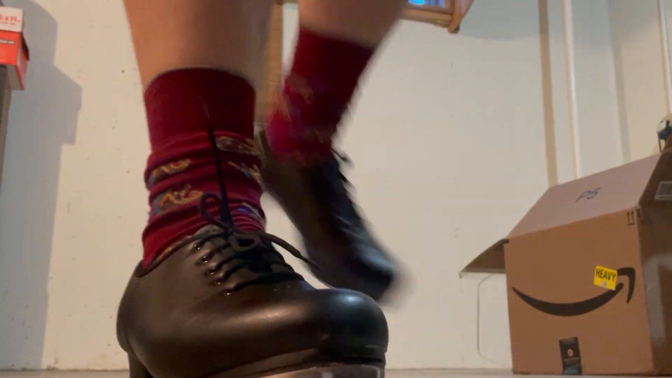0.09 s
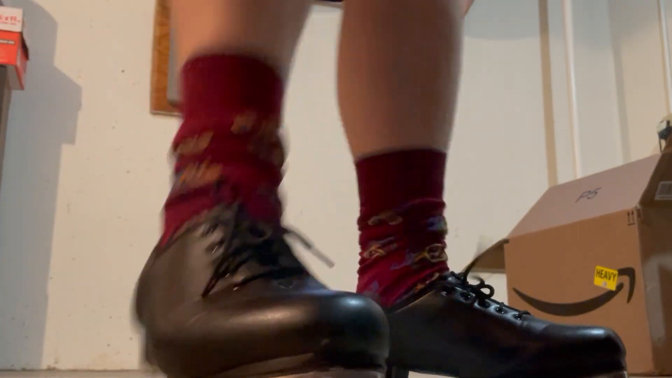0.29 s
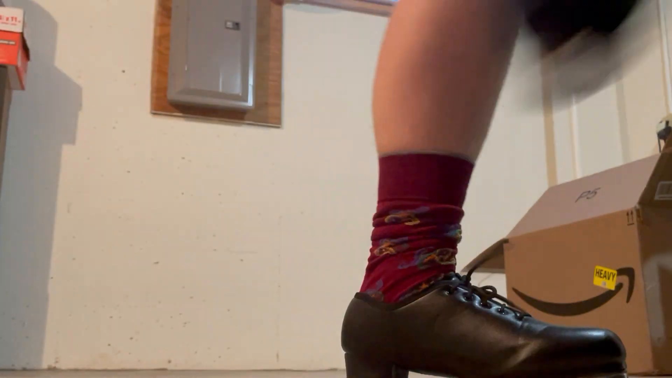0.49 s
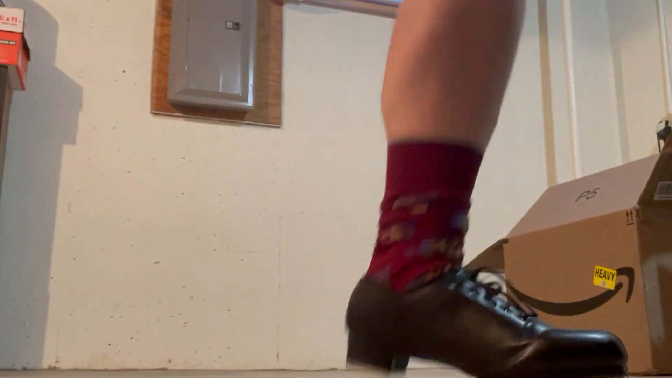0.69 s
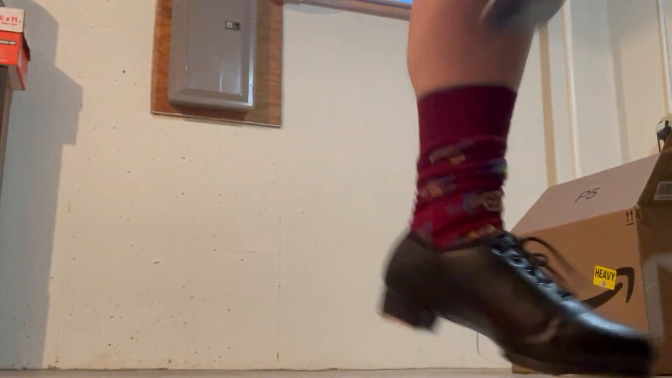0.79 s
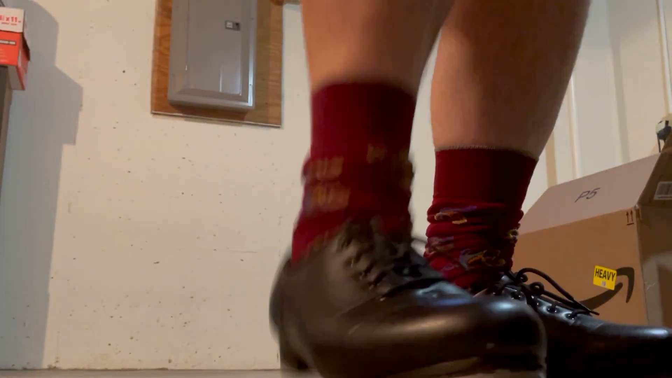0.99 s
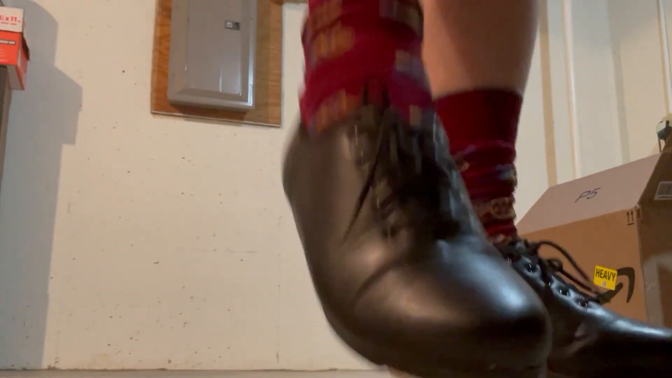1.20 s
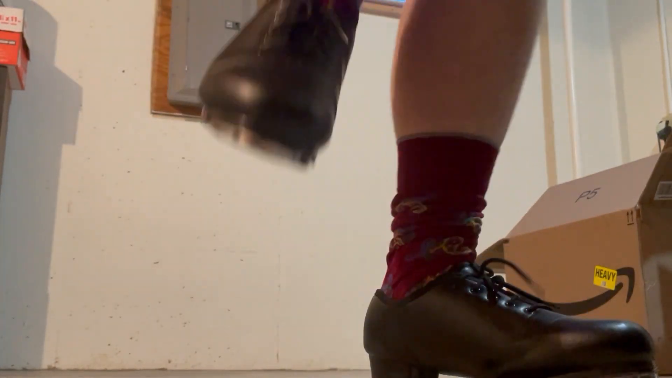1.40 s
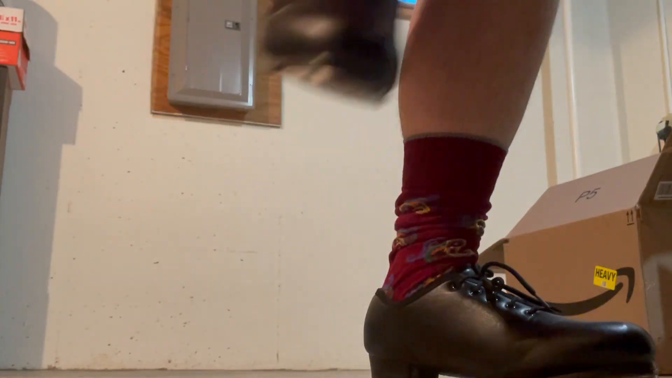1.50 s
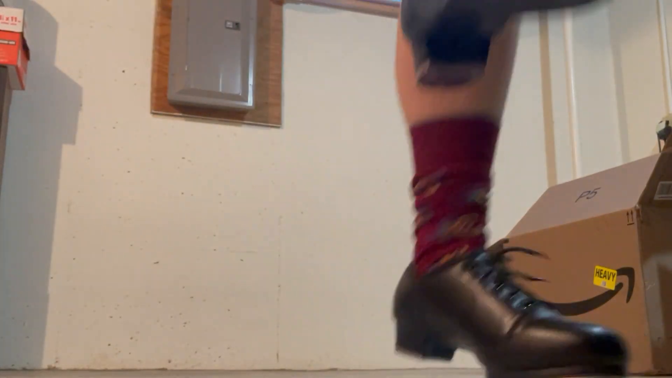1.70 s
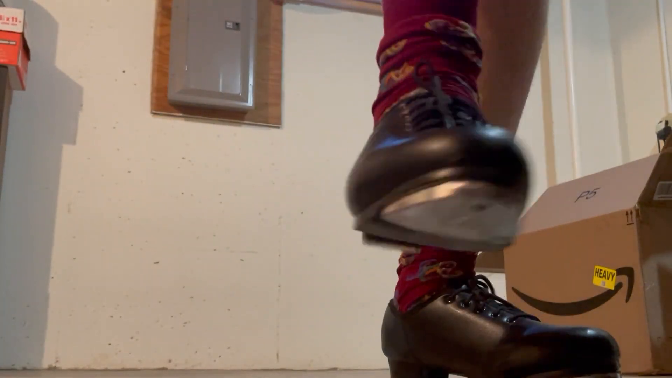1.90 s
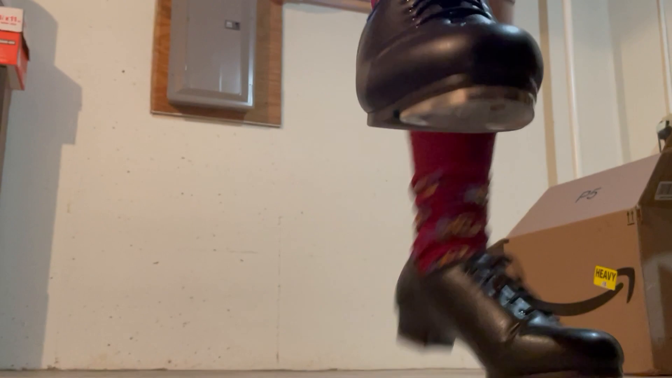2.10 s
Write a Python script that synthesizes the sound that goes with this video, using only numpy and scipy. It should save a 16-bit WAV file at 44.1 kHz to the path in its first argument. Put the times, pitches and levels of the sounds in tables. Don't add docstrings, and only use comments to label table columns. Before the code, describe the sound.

Tap shoes strike a hard floor very close to a phone microphone: a dense rattling burst, a pause, a quick double cluster with scrapes, then two separate hits, with short bare-room echo and faint air hush.

```python
import sys
import numpy as np
from scipy import signal
from scipy.fft import rfft, irfft, next_fast_len
from scipy.io import wavfile

SR = 44100
rng = np.random.default_rng(int(sys.argv[2]) if len(sys.argv) > 2 else 0)


def pcm_store(signal):
    levels = np.round(np.clip(np.atleast_2d(signal), -1, 1) * 32767)
    wavfile.write(sys.argv[1], SR, levels.astype(np.int16).T)


def field_ratio(decibels):
    return 10 ** (np.asarray(decibels, dtype=float) / 20)


N = 92610
SIZE = next_fast_len(N + SR)
HZ = np.arange(SIZE // 2 + 1) * SR / SIZE


def curve(table, hz=HZ):
    rows = np.array(table, float)
    return np.interp(np.log(hz + 1), np.log(rows[:, 0] + 1), rows[:, 1])


def shaped(x, gain):
    return irfft(rfft(x, SIZE) * gain, SIZE)[..., :N]


def add(track, s, sound):
    i = int(s * SR)
    a, b = max(i, 0), min(i + len(sound), N)
    track[a:b] += sound[a - i:b - i]


def ring(modes, length_s, chance, late_s=0.):
    t = np.arange(int(length_s * SR)) / SR
    scatter_db, detune = 8, 0.0092
    out = np.zeros(len(t))
    for (hz, db, t60), (louder, higher) in zip(modes, chance):
        tone = np.sin(2 * np.pi * hz * (1 + detune * higher) * (t - late_s))
        out += field_ratio(db + scatter_db * louder) * field_ratio(-60 * t / t60) * tone
    return out


def hush():
    # f/Hz, level/dB
    colour = [(30, -10.5), (60, 5.5), (200, -8.5), (800, -13), (2200, -14.5), (4500, -36), (9000, -26.5),
              (16000, -29)]
    # t/s, level/dB
    swell = [(0, -5), (.14, 3), (.19, -6), (.5, 0), (2.1, -3)]
    air = shaped(rng.standard_normal((2, N)), field_ratio(curve(colour)))
    level_db = -60 + np.interp(np.arange(N) / SR, *np.array(swell).T)
    return air / air.std() * field_ratio(level_db)


def scuffs():
    # start/s, loudest/s, end/s, level/dB, resonance f/Hz
    slides = [(-.02, 0.001, 0.1, -58, 2130), (0.109, 0.115, 0.13, -54.5, 1190),
              (0.073, 0.11, 0.15, -69, 10500), (.207, 0.232, 0.24, -35.5, 1140),
              (0.453, 0.723, 0.95, -62.5, 14400), (1.452, 1.64, 1.92, -64, 14500),
              (1.98, 2.073, 2.24, -66, 14700), (0.699, 0.726, 0.71, -54, 3770),
              (0.774, 0.794, 0.816, -48, 344), (0.777, 0.811, 0.89, -52, 2400),
              (0.798, 0.843, 0.85, -56, 2580), (1.202, 1.25, 1.43, -46.5, 9500),
              (0.958, 0.978, .98, -23, 3100), (0.988, 1.024, 1.07, -33.5, 3600),
              (1.057, 1.123, 1.297, -41, 3300), (1.148, 1.206, 1.214, -46, 700),
              (1.226, 1.241, 1.272, -36, 2000), (1.24, 1.258, 1.33, -33.5, 1250),
              (1.243, 1.28, 1.285, -33, 5200), (1.581, 1.585, 1.608, -53.5, 2598),
              (1.653, 1.685, 1.68, -48.5, 200), (1.673, 1.711, 1.87, -39, 1370),
              (1.688, 1.733, 1.794, -35, 4900), (1.748, 1.761, 1.766, -22, 1194),
              (2.05, 2.045, 2.04, -53.5, 2500), (.232, .238, 0.27, -23, 1250),
              (.254, 0.264, 0.27, -25, 4260), (.42, 0.543, 0.73, -63, 8550), (1.17, 1.231, 1.22, -48, 162),
              (.33, 0.353, .42, -44.5, 161), (0.867, 0.88, 0.89, -29.5, 3900),
              (1.6, 1.674, 1.76, -62.5, 7500)]
    edge_db, air_db, grit_db, width = -24, -6, 1.8, 0.59
    out, length = np.zeros(N), SR // 2
    for start, top, end, db, hz in slides:
        grit = rng.standard_normal(length) * field_ratio(grit_db * rng.exponential(size=length))
        t = start + np.arange(length) / SR
        peak = signal.lfilter(*signal.iirpeak(hz, 1 / width, fs=SR), grit)
        air = np.diff(grit, prepend=0) * 0.61 + grit
        air_share = field_ratio(air_db) * min(hz / 4500, 1) ** 2
        scrape = peak / peak.std() + air_share * air / air.std()
        turns = [start, max(top, start + .001), max(end, top + .002)]
        edge = np.interp(t, turns, [edge_db, 0, edge_db])
        add(out, start, field_ratio(db + edge) * (t < end) * scrape)
    return out


def taps():
    # t/s, crack level/dB, plate ring f/Hz, ring level/dB, sole knock level/dB
    contacts = [(.2262, -40, 1173, -53, -21), (0.2297, -2, 2670, -13, -6.5),
                (0.2325, -20.5, 4300, -18, -10), (0.2412, -1.5, 2190, -8, -10),
                (0.2425, -9.5, 5770, -16, -12), (0.2443, -6.5, 4280, -5, -8.5),
                (0.2508, -17.5, 4070, -15, -19), (0.2635, -9.5, 6560, -24, -27),
                (.8760, -30, 3846, -26, -28), (0.8827, -11, 4000, -2, -30),
                (0.8859, -5.5, 2920, -13, -20.5), (0.8885, -32, 2040, -18.5, -19),
                (0.9743, -3.5, 15100, -12, -25), (.9756, -11.5, 3930, -15, -18),
                (0.9781, -20, 2930, -14, -18.5), (0.9913, -18.5, 4820, -20.5, -34),
                (1.0098, -28.5, 3600, -25, -54), (1.0346, -18, 4040, -23, -22),
                (1.3014, -6.5, 3024, -12, -25.5), (1.3023, -14, 3830, -13.5, -30.5),
                (1.3042, -15.5, 3820, -14, -11.5), (1.7601, -2.5, 3290, -11, -7),
                (1.7612, -11.5, 7060, -14, -24), (1.7624, -9, 3010, -24, -10.5)]
    # t/s, level/dB, f/Hz
    ticks = [
        (0.1027, -51, 4450),
        (0.661, -47, 2580),
        (.699, -38.5, 2820),
        (0.7965, -43.5, 3180),
        (0.81, -51, 3300),
        (1.574, -45, 2726),
        (1.5944, -31.5, 2700),
        (2.04, -47, 3000),
        (2.0588, -34.5, 2520),
    ]
    # f/Hz, level/dB, time to fall 60 dB/s
    plate = [(2400, -15.5, 0.016), (3480, -8.5, 0.023), (4640, -38, .01), (5900, -45, 0.0028),
             (7480, -19, 0.03), (10500, -28, .006), (15600, -26, 0.0053)]
    # f/Hz, level/dB, time to fall 60 dB/s
    sole = [(1029, -19, 0.04), (1226, 0.5, 0.024), (1392, 4.5, 0.012), (2170, -12, 0.012)]
    ring_t60_s, crack_t60_s, spike_t60_s = 0.0047, 0.0038, 0.00058
    out, rings, t = np.zeros(N), np.zeros(N), np.arange(SR // 20) / SR
    small = [(s, db - 5, hz, db - 8.5, db - 17) for s, db, hz in ticks]
    for s, crack_db, hz, ring_db, sole_db in [*contacts, *small]:
        chance = rng.standard_normal((2, 8, 2))
        grit = rng.standard_normal(len(t))
        spike = field_ratio(3 - 60 * t / spike_t60_s) * np.cos(2 * np.pi * hz * t)
        crack = field_ratio(1 - 60 * t / crack_t60_s) * grit + spike
        crack = crack + field_ratio(-8.5) * ring(plate, .05, .5 * chance[0])
        fade = (1 - np.exp(-t / 0.0001)) * field_ratio(-60 * (t / ring_t60_s) ** 2)
        tone = np.sin(2 * np.pi * hz * t) * fade
        knock = ring(sole, .05, .5 * chance[1])
        add(out, s, field_ratio(crack_db) * crack)
        add(rings, s, field_ratio(ring_db) * tone + field_ratio(sole_db - 7) * knock)
    cracks = signal.lfilter(*signal.butter(2, 500, "high", fs=SR), out)
    return cracks, rings


def weight():
    # t/s, heel thud level/dB, floor thump level/dB, thump time to fall 60 dB/s, floor hum level/dB
    landings = [
        (.243, -18, -20, 0.12, -43),
        (0.792, -68, -49, 0.092, -74),
        (.888, -29, -51, .1, -40),
        (0.9758, -12.5, -42, 0.045, -61),
        (1.302, -28, -38, 0.12, -35),
        (1.761, -27, -36.5, 0.34, -29.5),
    ]
    # f/Hz, level/dB, time to fall 60 dB/s
    heel = [(200, -11, 0.015), (351, -3.3, 0.013), (460, 0, 0.0081), (700, -0.5, 0.005)]
    # f/Hz, level/dB, time to fall 60 dB/s
    floor = [(65.3, 0.5, 0.47), (91, 5.5, 1), (140, 2.5, 0.51), (208, -8.5, 0.5), (302, -12, 1.5)]
    # f/Hz, level/dB, time to fall 60 dB/s
    slab = [(43, -11, .5), (54.95, 0.5, 0.95), (69.8, -3.5, .6), (135, 4, 0.22)]
    boom_late_s, hum_late_s, hum_rise_s, thump_rise_s = 0.0041, 0.032, .012, 0.007
    thud, boom, t = np.zeros(N), np.zeros(N), np.arange(SR) / SR
    for s, thud_db, thump_db, t60, hum_db in landings:
        chance = rng.standard_normal((2, 8, 2))
        add(thud, s, field_ratio(thud_db) * ring(heel, .1, chance[0]))
        thump = field_ratio(thump_db - 60 * t / t60) * ring(floor, 1, .4 * chance[1], 0.0047)
        thump = thump * (1 - np.exp(-t / thump_rise_s)) ** 2
        hum = field_ratio(hum_db) * ring(slab, 1, 0 * chance[1], hum_late_s)
        hum = hum * (1 - np.exp(-t / hum_rise_s)) ** 2
        add(boom, s + boom_late_s, thump + hum)
    return thud, boom


def knocks():
    # t/s, level/dB, f/Hz
    blows = [
        (.243, -15, 300),
        (.785, -36.5, 327),
        (.888, -21, 300),
        (1.304, -20.5, 315),
        (1.763, -21.5, 475),
    ]
    out, t = np.zeros(N), np.arange(SR // 10) / SR
    t60_s = 0.026
    for s, db, hz in blows:
        burst = signal.lfilter(*signal.iirpeak(hz, 1.2, fs=SR), rng.standard_normal(len(t)))
        add(out, s, field_ratio(db - 60 * t / t60_s) * burst / burst.std())
    return out


def room():
    # f/Hz, time to fall 60 dB/s
    tail_t60 = [(60, 0.68), (300, 0.57), (1000, 0.55), (2500, 0.5), (5000, 0.45), (8000, 0.4),
                (11000, 0.28), (16000, 0.19)]
    # f/Hz, level/dB
    tail_tone = [(60, -1), (300, -1), (1000, -0.53), (3000, -2), (6000, -4), (16000, -5)]
    # delay/s, level/dB
    echoes = [
        (.0035, -7.5),
        (0.014, -18.5),
        (0.022, -18.5),
        (.033, -32),
    ]
    rise_from_s, rise_s, near_db, smear_s = 0.0027, 0.012, -4, 0.00065
    t, out = np.arange(SR) / SR, 0
    noise = rfft(rng.standard_normal((2, SR)))
    octave = np.log2(np.arange(SR // 2 + 1) + 1.)
    for k in np.arange(5, 14.6, .5):
        band = irfft(noise * np.clip(1 - 2 * abs(octave - k), 0, 1), SR)
        out = out + band * field_ratio(-60 * t / curve(tail_t60, 2 ** k) + curve(tail_tone, 2 ** k))
    rise = np.clip((t - rise_from_s) / rise_s, 0, 1) + field_ratio(near_db)
    out = out * rise * field_ratio(-4) / 40
    for s, db in echoes:
        i = int(s * SR)
        puff = rng.standard_normal((2, 200)) * np.exp(-t[:200] / smear_s)
        out[:, i:i + 200] += field_ratio(db) * puff / np.sqrt((puff ** 2).sum(axis=1, keepdims=True))
    return out


def scene():
    # f/Hz, share (0 to 1)
    unlike = [(100, 0.16), (300, 0.67), (700, 1), (1500, 0.74), (2200, 0.76), (3000, 0.15), (16000, 0.037)]
    # f/Hz, level/dB
    near_lean = [(200, -1), (700, -2.5), (1700, -8), (2400, -1.5)]
    boom_lean_db = -0.5
    air, slides, walls = hush(), scuffs(), room()
    cracks, rings = taps()
    thud, boom = weight()
    sent = cracks + slides + field_ratio(-8) * rings + field_ratio(-15.5) * thud + knocks()
    far = shaped(sent, rfft(walls, SIZE)) + air
    apart = np.clip(curve(unlike), 0, 1)
    same = shaped(far[0], np.sqrt(1 - apart ** 2 / 2))
    other = shaped(far[1], apart / np.sqrt(2))
    halves = np.array([[.5], [-.5]])
    near = shaped(cracks + slides + rings + thud, field_ratio(halves * curve(near_lean)))
    return near + boom * field_ratio(halves * boom_lean_db) + same + other * np.array([[1], [-1]])


def low_pass(x):
    return signal.sosfilt(signal.butter(12, 17150, fs=SR, output="sos"), x)


def record(dry):
    # f/Hz, level/dB
    mic = [(30, -5), (100, -6.5), (1000, -3.5), (4000, 1.5), (7500, -0.5), (9000, -1), (13000, -10.5),
           (15500, -6.5)]
    # f/Hz, level/dB
    lean = [(60, -3), (400, -2.5), (1500, 0.5), (2500, 0.2)]
    # f/Hz, phase/rad
    turn = [(0, 0), (2200, .5), (5100, .2), (5800, 1.1), (7200, 1.3), (8600, np.pi), (14900, 4 * np.pi),
            (15800, 4.25 * np.pi)]
    top_hz, low_hz, ceiling = 15950, 42, .95
    half = field_ratio(curve(lean) / 2) * np.exp(.5j * np.interp(HZ, *np.array(turn).T))
    wet = shaped(dry, field_ratio(curve(mic)) * np.array([half, 1 / half]))
    wet = ceiling * np.tanh(wet / ceiling)
    wet = signal.sosfilt(signal.butter(4, low_hz, "high", fs=SR, output="sos"), wet)
    wet = shaped(wet, 1 / (1 + (HZ / top_hz) ** 120) + field_ratio(-27))
    return low_pass(wet)


dry = scene()
out = record(dry)
pcm_store(out)
```